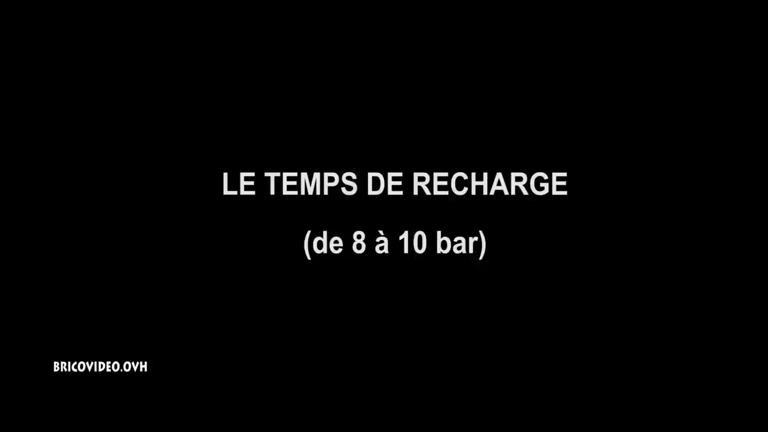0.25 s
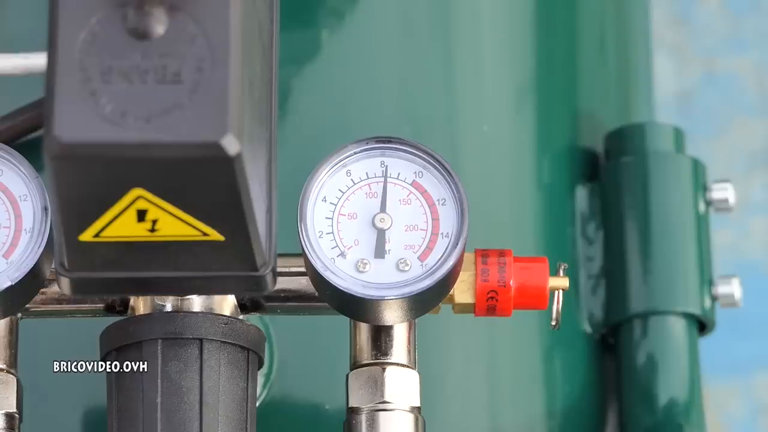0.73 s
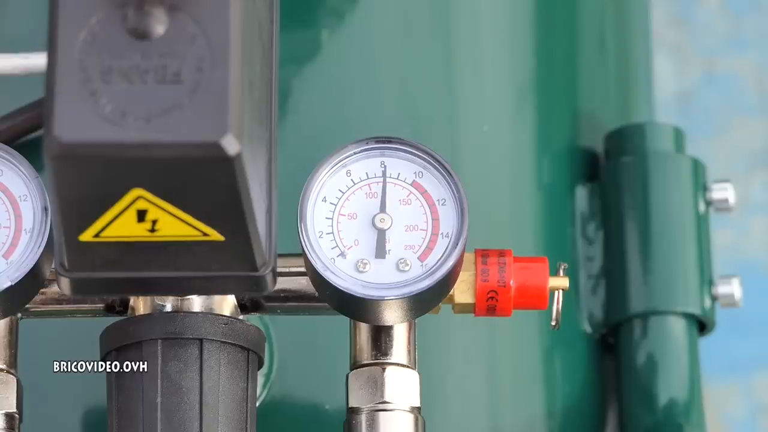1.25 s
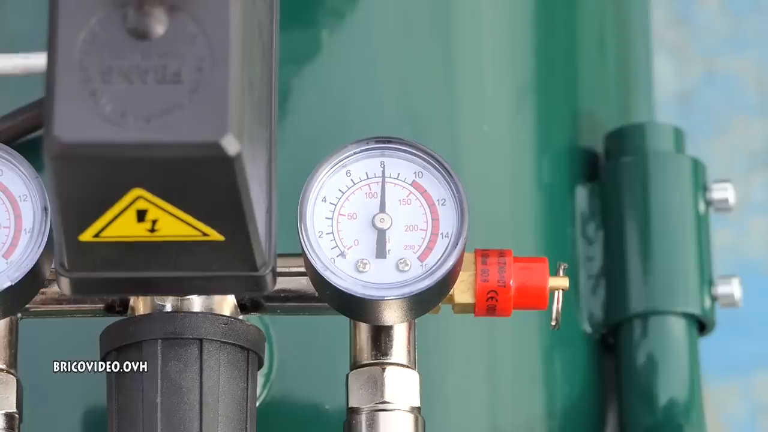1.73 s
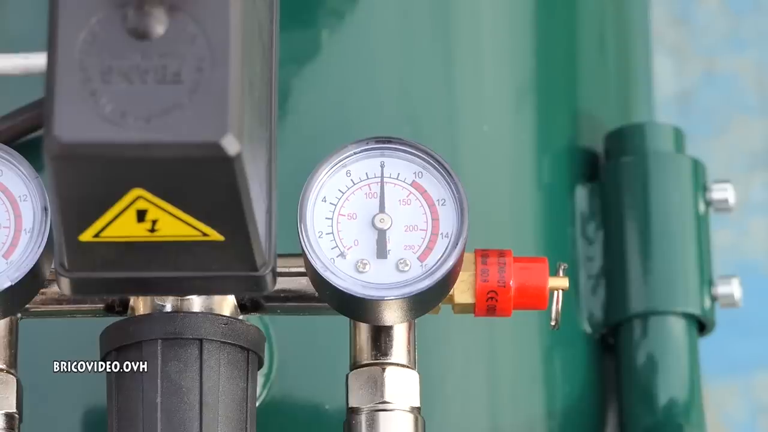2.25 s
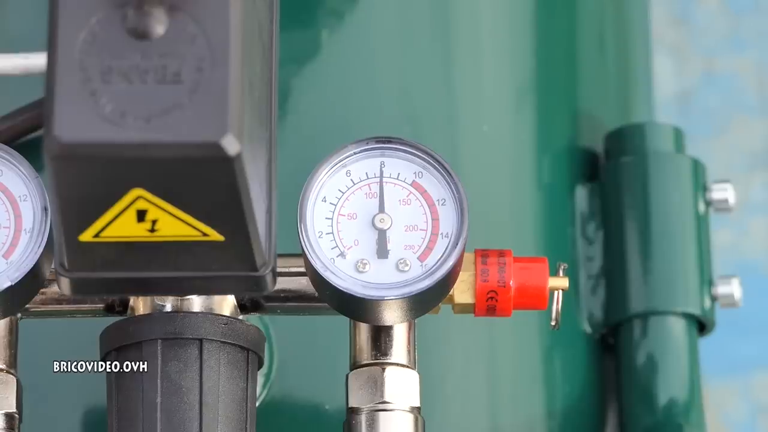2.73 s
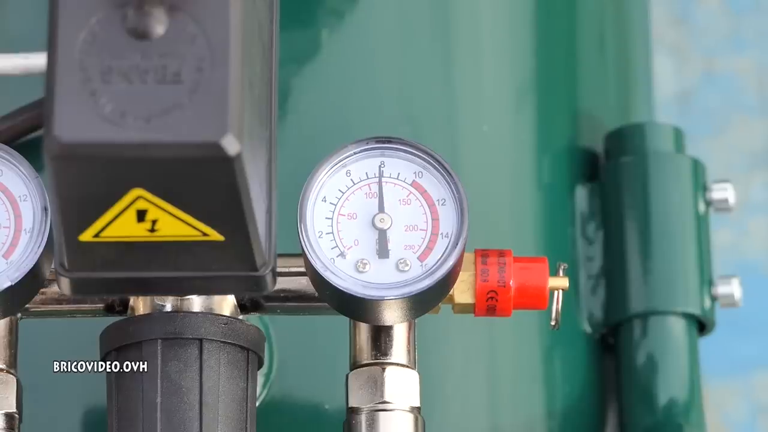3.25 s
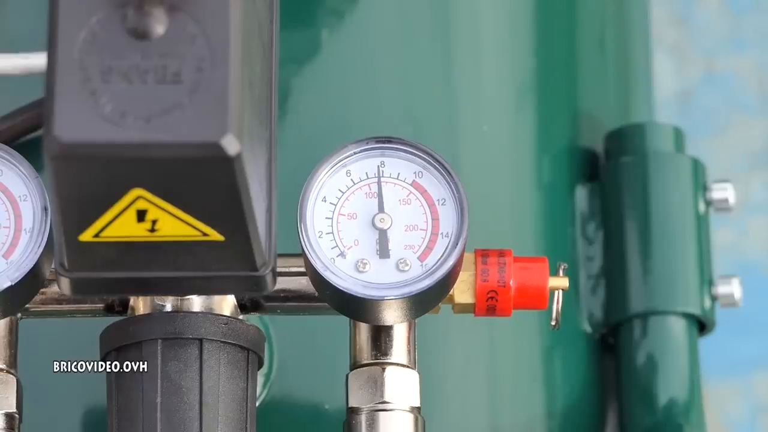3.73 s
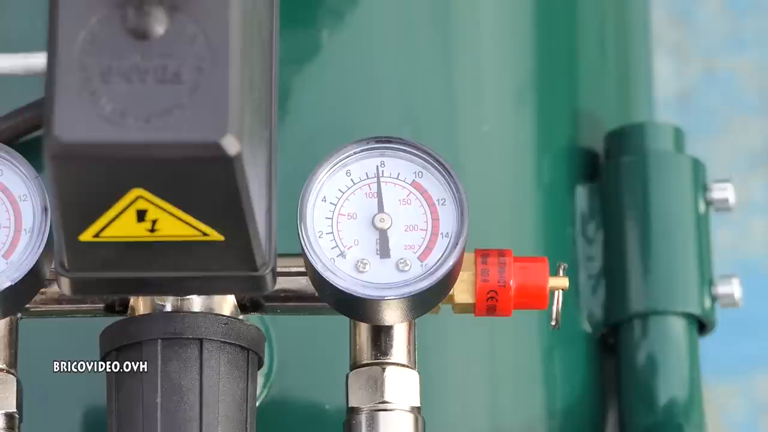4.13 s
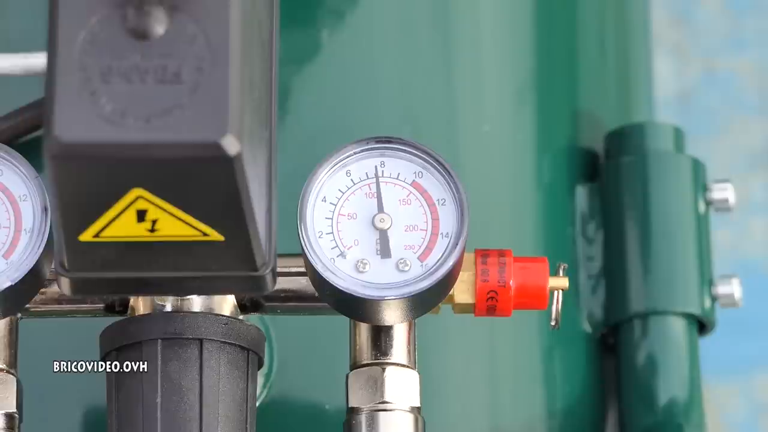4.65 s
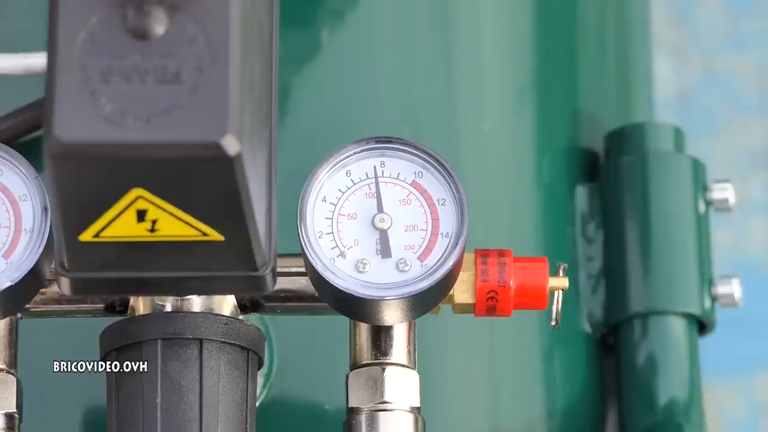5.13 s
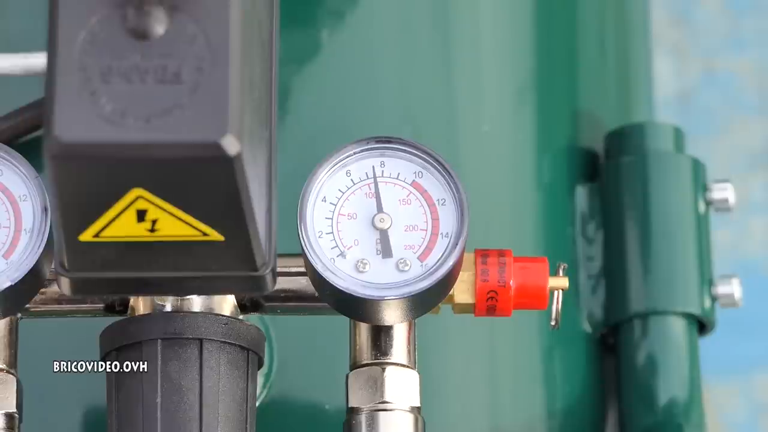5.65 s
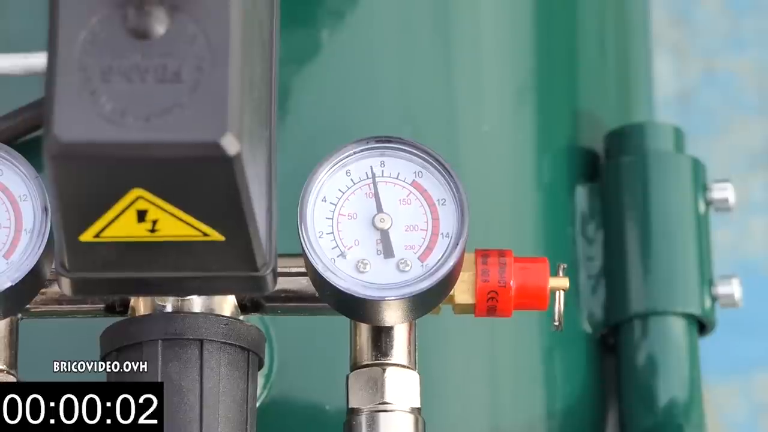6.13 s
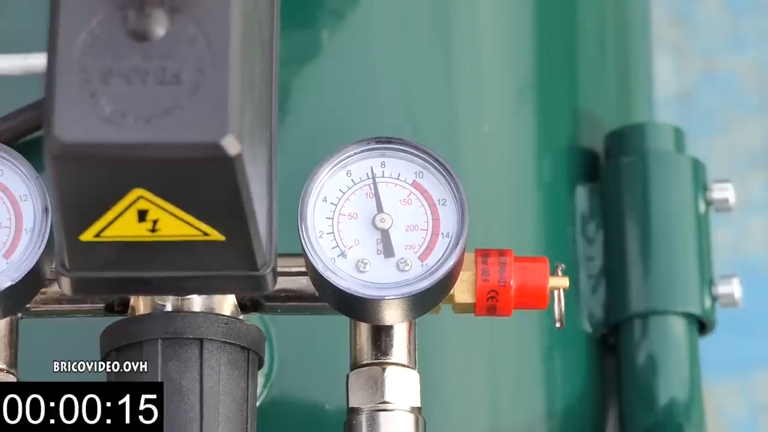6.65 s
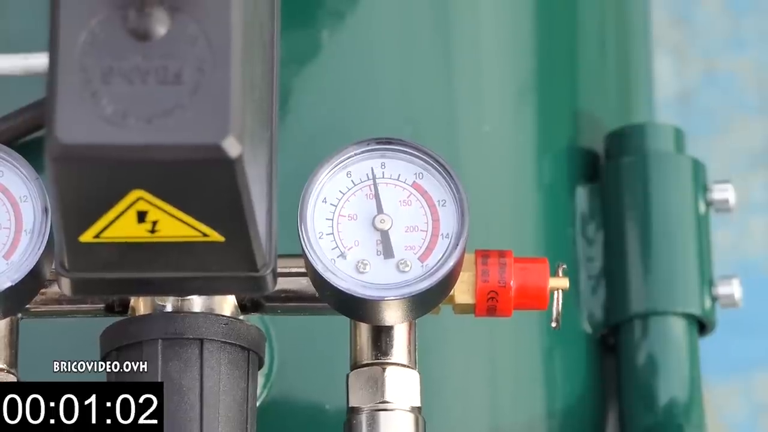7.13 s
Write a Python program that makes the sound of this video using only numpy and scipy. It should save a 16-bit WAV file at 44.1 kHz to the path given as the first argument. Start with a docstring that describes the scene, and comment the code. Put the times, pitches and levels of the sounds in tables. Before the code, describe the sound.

An air tool hammers rapidly with hissing puffs and metallic clacks, then stops as an electric compressor pump starts humming.

```python
"""Beside a compressor, an air tool hammers away, and near the end an electric pump cuts in behind it.
The tool puffs through its muffler, hisses and whistles at its ports and knocks its housing in every cycle;
now and then the piston strikes steel with a bright clack. Nearby metal scatters the tool's treble.
The pump hums in orders of its shaft speed, with a valve chuff each turn, gear clatter and fan noise.
The tool stops first and leaves the pump, which grows louder ever more slowly."""
import sys
import numpy as np
from scipy import signal
from scipy.fft import rfft, irfft, next_fast_len
from scipy.io import wavfile
from scipy.ndimage import uniform_filter1d, map_coordinates

SR = 44100
rng = np.random.default_rng(int(sys.argv[2]) if len(sys.argv) > 2 else 0)


def unload_audio(sound):
    """Save the sound as a 16-bit wav file, at the path given as the first command line argument."""
    columns = np.transpose(np.atleast_2d(sound))
    # keep every value between -1 and 1, then stretch to whole-number steps
    steps = np.round(np.clip(columns, -1, 1) * 32767)
    wavfile.write(sys.argv[1], SR, steps.astype(np.int16))


N = 326163
TIME = np.arange(N) / SR  # seconds


def amp(db):
    """Amplitude of a level in dB."""
    return 10 ** (np.asarray(db) / 20)


def unit(x):
    """x at rms 1."""
    return x / np.sqrt(np.mean(x ** 2) + 1e-20)


def ramp(x):
    """0 below 0, 1 above 1, straight between."""
    return np.clip(x, 0, 1)


def along(points, hz):
    """Read a curve of (Hz, value) points on a log frequency axis."""
    f, v = np.transpose(points)
    return np.interp(np.log(hz + 1), np.log(f + 1), v)


def wobble(rate):
    """A smooth random curve with rate knots a second."""
    knots = rng.standard_normal(int(N * rate / SR) + 4)
    return map_coordinates(knots, [TIME * rate])


def taps(times, sizes):
    """One impulse at each time in seconds."""
    return np.bincount(np.round(times * SR).astype(int), sizes, N)[:N]


def filtered(x, response):
    """x times a complex response of frequency, padded so that tails do not wrap round."""
    m = next_fast_len(N + SR // 2)
    f = np.fft.rfftfreq(m, 1 / SR)
    return irfft(rfft(x, m) * response(f), m)[..., :N]


def resonance(f, hz, width):
    """One causal resonance with a peak gain of 1; the narrower it is, the longer it rings."""
    return 1j * f * width / (hz * hz - f * f + 1j * f * width)


def body(modes):
    """Response of a solid body: (Hz, width, dB) modes added with alternating sign."""
    def response(f):
        return sum((-1) ** k * amp(db) * resonance(f, hz, width)
                   for k, (hz, width, db) in enumerate(modes))
    return response


def colour(points):
    """Response that follows a curve of (Hz, dB) points."""
    return lambda f: amp(along(points, f))


def noise(response, alike):
    """Stereo noise of rms 1; the balance of mid and side sets the left-right likeness at each pitch."""
    def mid_side(f):
        turn = np.arccos(np.clip(along(alike, f), 0, 1)) / 2
        return response(f) * np.array([np.cos(turn), np.sin(turn)])
    mid, side = filtered(rng.standard_normal((2, N)), mid_side)
    return unit(np.array([mid + side, mid - side]))


PUMP_ON_S, SPIN_UP_S = 5.9, .16
PUMP_DB, PUMP_GROWTH_DB, PUMP_GROWTH_S = -22, 13, 0.83  # full level, climb towards it, time constant


def pump_level():
    """A quick spin-up, then a slow climb towards full loudness."""
    running = np.maximum(TIME - PUMP_ON_S, 0)
    level_db = PUMP_DB - PUMP_GROWTH_DB * np.exp(-running / PUMP_GROWTH_S)
    return ramp(running / SPIN_UP_S) * amp(level_db)


VALVE_LEAK_DB = -10.5
# The pump's valves. Each row: opening point, rise and fade in shares of a turn, relative level in dB.
VALVE_RUSHES = [(.1, .04, .07, -6.5), (.41, .08, .22, 1.5)]


def valve_flow(turns):
    """Each valve opens once a turn and lets a short rush of air through, over a steady leak."""
    power = amp(VALVE_LEAK_DB) ** 2
    for opens, rise, fade, db in VALVE_RUSHES:
        since = (turns - opens) % 1
        fading = np.exp(-(np.maximum(since - rise, 0) / fade) ** 2)
        power = power + (amp(db) * ramp(since / rise) * fading) ** 2
    return np.sqrt(power)


SHAFT_HZ = 47.42
WEAK_ORDER_DB = -37  # relative level of every order not in the table
# Strong orders of the pump's hum. Each row: multiple of the shaft speed, relative level in dB.
HUM_ORDERS = [(2, -16), (3, -1.5), (4, -18), (5, -11), (6, -15), (8, 1), (9, -10), (10, -25), (12, -21.5),
              (13, -15), (15, -21), (16, -26), (17, -12.5), (18, -12), (19, -11), (20, -16.5), (21, -22),
              (25, -22), (29, -22.5), (30, -23), (32, -16.5)]


def pump_hum(angle, count=32, waver_db=3, spread=0.38):
    """Harmonics of the shaft speed; the high ones waver more and differ more between left and right."""
    strong = {round(order): db for order, db in HUM_ORDERS}
    hum = np.zeros((2, N))
    for k in range(1, count + 1):
        high = k / count
        # the casing delays each order differently, smearing the pressure pulse into an even buzz
        phase = 1.68 * k ** 2 + .3 * rng.standard_normal()
        phase = phase + spread * np.sqrt(high) * rng.standard_normal((2, 1))
        level_db = strong.get(k, WEAK_ORDER_DB) + waver_db * high * wobble(8) / 2
        hum += amp(level_db) * np.sin(k * angle + phase)
    return unit(hum)


def gear_clatter(turns):
    """The same burst of noise repeats on every turn, rung around 2 kHz."""
    length = round(SR / SHAFT_HZ)
    one_turn = rng.standard_normal(length)
    rattle = map_coordinates(one_turn, [turns % 1 * length], mode="grid-wrap")
    return unit(filtered(rattle, lambda f: resonance(f, 2050, 1040) ** 2))


# Colour of the valve chuff. Each row: frequency in Hz, spectral level in relative dB per Hz.
CHUFF_SPECTRUM = [(300, -2.5), (1500, -2), (2300, -4.5), (3500, -2), (5500, 0.5), (7500, -3), (10800, 3),
                  (12500, -1.5), (15500, -13)]
# Colour of the motor's fan. Each row: frequency in Hz, spectral level in relative dB per Hz.
FAN_SPECTRUM = [(25, -14), (100, 3), (400, -7), (650, -11), (880, 4), (1200, -18), (2200, 1.5), (3000, -12),
                (8000, -21), (16000, -35)]


def pump(chuff_db=-6, fan_db=-20, clatter_db=-22):
    """A steadily turning motor: hum, valve chuff, clatter and fan, balanced in dB against the hum."""
    turns = SHAFT_HZ * TIME
    hum = pump_hum(2 * np.pi * turns + .006 * wobble(12))
    chuff_noise = noise(colour(CHUFF_SPECTRUM), [(1000, 0.88)])
    chuff = amp(chuff_db + 0.82 * wobble(45)) * valve_flow(turns) * chuff_noise
    clatter = amp(clatter_db) * gear_clatter(turns)
    fan = amp(fan_db) * noise(colour(FAN_SPECTRUM), [(40, 0.16), (300, 0.84), (3000, 0.82)])
    return pump_level() * (hum + chuff + clatter + fan)


def surroundings(x, db=-8, t60=0.052):
    """Nearby metal scatters the treble, differently to each side, and ripples its spectrum."""
    t = np.arange(SR // 20) / SR
    tail = rng.standard_normal((2, len(t))) * amp(-60 * t / t60) * (t > .001)
    scattered = signal.fftconvolve(x, tail / np.linalg.norm(tail[0]), axes=1)[:, :N]
    return x + amp(db) * filtered(scattered, lambda f: 1j * f / (1500 + 1j * f))


PRESS_S, OPEN_S, LET_GO_S, BLEED_DB_PER_S = .679, 0.0084, 6.268, 350


def trigger():
    """Gate on the tool's sound: air comes on at once, holds, and bleeds away on release."""
    return ramp((TIME - PRESS_S) / OPEN_S) * amp(-BLEED_DB_PER_S * np.maximum(TIME - LET_GO_S, 0))


REBOUND_S = .0226  # beat of the strikes within a run
RUN_FALL_DB = 2.2  # loss for each step away from the hardest strike
# Runs of hard strikes on steel. Each row: time of the hardest in seconds, its relative level in dB,
# number of strikes before it, number of strikes after it.
STRIKE_RUNS = [(0.8037, -14.5, 0, 0), (.9408, -22, 0, 0), (1.082, -15, 0, 0), (1.3663, -12.5, 0, 0),
               (1.7453, -22, 0, 0), (1.8885, -23, 0, 0), (2.0245, -14.5, 1, 0), (2.308, -13, 1, 0),
               (2.6805, -12.5, 0, 0), (2.75, -25, 2, 0), (2.9222, -22, 0, 0), (3.0333, -13.5, 0, 0),
               (3.6373, -11.5, 1, 2), (4.1179, -15, 0, 0), (5.165, -19, 0, 0), (5.25, -12, 0, 2),
               (5.614, -17, 0, 0), (5.7132, -13, 2, 0), (5.9041, -14.5, 1, 0), (6.0401, -13.5, 1, 0)]


def strikes():
    """(seconds, dB) of every hard strike: in a run the piston rebounds at a steady, faster beat."""
    hits = []
    for s, db, before, after in STRIKE_RUNS:
        for k in range(-round(before), round(after) + 1):
            hits.append((s + k * REBOUND_S, db - RUN_FALL_DB * abs(k)))
    return hits


CYCLE_S, CYCLE_JITTER = .0293, .028  # nominal cycle, stretched to fit between strikes; jitter as a share
FIRST_BLOW_S, LAST_BLOW_S = .690, 6.294  # the cycles fill this span; the end itself has no blow


def piston_cycles(soft_db=-28, full_db=-13):
    """Blow times and hardness 0-1; a hard strike throws the piston back early."""
    marks = [(FIRST_BLOW_S, soft_db)] + strikes() + [(LAST_BLOW_S, soft_db)]
    times, force = [], []
    for k, ((start, db), (end, _)) in enumerate(zip(marks, marks[1:])):
        lead = REBOUND_S if k else CYCLE_S
        count = max(round((end - start - lead) / CYCLE_S), 0)
        steps = np.r_[lead, CYCLE_S * (1 + CYCLE_JITTER * rng.standard_normal(count))]
        stretch = (end - start) / steps.sum()
        times += list(start + (np.cumsum(steps) - steps) * stretch)
        force += [ramp((db - soft_db) / (full_db - soft_db))] + [0] * count
    return np.array(times), np.array(force)


# Partial notches cut by the muffler's chambers. Each row: frequency in Hz, width in Hz, depth 0-1.
MUFFLER_NOTCHES = [(171, 8.6, 0.48), (371, 16, 0.74), (624, 33, 0.48), (815.4, 23, 0.9)]
# Resonances of the muffler's chambers. Each row: frequency in Hz, width in Hz, relative level in dB.
MUFFLER_CHAMBERS = [(235, 40.4, 0), (424, 18, -29.5), (728, 63, -29)]
# Reflections of the puff. Each row: delay in seconds, signed strength as a share of the direct puff.
PUFF_ECHOES = [(.00486, -0.2), (.00786, -0.31), (0.016, .1)]


def muffler(f, boom_db=-25, low_hz=70):
    """Response from exhaust port to outlet: chambers, phase shift, boom, notches and reflections."""
    chambers = sum(amp(db) * resonance(f, hz, width) for hz, width, db in MUFFLER_CHAMBERS)
    allpass = 2 * resonance(f, 1035, 1500) - 1
    through = chambers * resonance(f, 690, 535) * allpass
    boom = amp(boom_db) * resonance(f, 128, 37) * resonance(f, 110, 130)
    notches = np.prod([1 - depth * resonance(f, hz, width) for hz, width, depth in MUFFLER_NOTCHES], axis=0)
    echoes = 1 + sum(g * np.exp(-2j * np.pi * f * s) for s, g in PUFF_ECHOES)
    outlet = f ** 2 / (f ** 2 + low_hz ** 2)  # a small outlet radiates little bass
    return (through + boom) * notches * echoes * outlet


def puffs(opens, force, db=32.5, scatter_db=0.63, bark_db=-4):
    """Low notes leave the muffler last, so puffs chirp down; the one after a hard strike barks brightly."""
    sizes = amp(db + scatter_db * rng.standard_normal(len(opens)))
    after_strike = np.roll(force, 1)
    barks = filtered(taps(opens, amp(bark_db) * sizes * after_strike), lambda f: resonance(f, 914, 410))
    return filtered(taps(opens, sizes) + barks, muffler)


SURGE_DELAY_S, SURGE_RISE_S, SURGE_FADE_S, LEAK_DB = .002, .0022, 0.0097, -8
RETURN_S, RETURN_WIDTH_S, RETURN_DB = .032, 0.0047, -8.5


def jet_flow(age, surge_db=-3.5):
    """Jet strength by seconds since opening: a dying surge over a leak, then a swell as the piston returns."""
    since = age - SURGE_DELAY_S
    surge = ramp(since / SURGE_RISE_S) * np.exp(-np.maximum(since - SURGE_RISE_S, 0) / SURGE_FADE_S)
    returning = np.exp(-((age - RETURN_S) / RETURN_WIDTH_S) ** 2)
    return amp(LEAK_DB) + amp(surge_db) * surge + amp(RETURN_DB) * returning


# Left-right likeness of the tool's noise. Each row: frequency in Hz, likeness 0-1.
TOOL_LIKENESS = [(40, 0), (300, 0.05), (1400, 0.32), (3000, 0.49), (7000, 0.93), (15000, 0.38)]


def tool_noise(response):
    """Air noise that spreads wide in the bass and narrows towards the treble, widening again at the top."""
    return noise(response, TOOL_LIKENESS)


# Ring of the tool's housing. Each row: frequency in Hz, width in Hz, relative level in dB.
HOUSING_MODES = [(1496, 38, -4.5), (1790, 47, -2.5), (1973, 70, -5.5), (2222, 103, -2), (2382, 126, -0.5),
                 (2488, 86, -3), (2720, 58, -5), (3330, 200, -9.5), (4820, 78, 1), (5920, 86, -0.5)]


def housing(f):
    """Response of the tool's housing."""
    return body(HOUSING_MODES)(f)


# Colour of the jet. Each row: frequency in Hz, spectral level in relative dB per Hz.
JET_SPECTRUM = [(30, -30), (100, -3), (400, 1), (1000, -4), (1500, -8.5), (2400, -3), (4200, -8), (4800, 0),
                (7000, -0.5), (10000, 1), (12500, -0.5), (14000, -5), (14800, -4), (15600, 0)]
# Edge tones of the exhaust ports. Each row: frequency in Hz, random spread in Hz, relative level in dB.
PORT_WHISTLES = [(8590, 120, -6), (9350, 25, -7), (9700, 75, -5.5), (13140, 87, 1)]


def exhaust(opens, force, jet_db=-24.5, whistle_db=-27, ring_db=-37.5, starve_db=10, scatter_db=1.16,
            whistle_scatter_db=3.5, choke_db=10):
    """Each cycle's jet hisses, rings the housing and whistles; a hard strike starves jet and whistle."""
    cycle = np.maximum(np.searchsorted(opens, TIME) - 1, 0)
    age = (TIME - opens[cycle]) % .036

    def chance():
        """One random draw held through each cycle."""
        return rng.standard_normal(len(opens))[cycle]

    starved_db = starve_db * force[cycle] * ramp((age - .004) / 0.023)
    # a short running mean, in samples, rounds the corners
    flow = uniform_filter1d(jet_flow(age) * amp(scatter_db * chance() - starved_db), size=70)
    flicker_db = 0.85 * wobble(700) + 1.15 * wobble(170)
    jet = amp(jet_db + flicker_db) * flow * tool_noise(colour(JET_SPECTRUM))
    ring = amp(ring_db + 2.5 * wobble(90)) * flow * tool_noise(housing)
    swell = np.exp(-((age - .011) / 0.0044) ** 2) * amp(-choke_db * force[cycle])
    for hz, spread, db in PORT_WHISTLES:
        # each surge catches the edge at a new pitch and strength
        pitch = hz + spread * (chance() + 1.1 * wobble(900))
        phase = 2 * np.pi * np.cumsum(pitch) / SR
        side_phase = 0.74 * np.array([chance(), chance()])
        tone = np.sin(phase + side_phase) * amp(3.95 * wobble(600))
        level = amp(whistle_db + db + whistle_scatter_db * np.minimum(chance(), 1))
        jet += level * flow * (0.27 + swell) * tone
    return jet + ring


# Ring of the struck steel. Each row: frequency in Hz, width in Hz, relative level in dB.
STEEL_MODES = [(5400, 960, 0), (6580, 830, 4), (7880, 210, 3)]


def knocks(blows, knock_db=3, strike_db=20):
    """Every blow rings the housing dully; the hard ones add a bright clack of steel."""
    soft = taps(blows, amp(knock_db + 2 * rng.standard_normal(len(blows))))
    hit_times, hit_db = np.transpose(strikes())
    hard = taps(hit_times, amp(hit_db + strike_db))
    thuds = filtered(soft, lambda f: housing(f) / (1 + 1j * f / 2500))
    clacks = filtered(hard, lambda f: body(STEEL_MODES)(f) * resonance(f, 7600, 4500))
    return thuds + clacks


# Stereo lean of the tool. Each row: frequency in Hz, left minus right in dB.
TOOL_LEAN = [(60, 6), (110, -2.5), (200, 0), (380, -1), (700, -1.0), (1290, -2.0), (2380, -3), (4400, -2.5),
             (8120, -2.5), (15000, 1.0)]


def air_tool(ahead=0.003998):
    """Puffs, jet and knocks, mostly a little to the right; the exhaust opens ahead (s) of each blow."""
    blows, force = piston_cycles()
    opens = blows - ahead
    sound = surroundings(puffs(opens, force) + exhaust(opens, force) + knocks(blows))
    placed = filtered(sound, lambda f: amp(np.array([along(TOOL_LEAN, f), -along(TOOL_LEAN, f)]) / 2))
    return trigger() * placed


def scene():
    """The tool hammers in front; the pump cuts in behind it and outlasts it."""
    return air_tool() + pump()


TOP_HZ = 15780


def record(dry):
    """A very steep low-pass: almost nothing remains above the top frequency."""
    return filtered(dry, lambda f: 1 / (1 + (f / TOP_HZ) ** 200))


dry = scene()
out = record(dry)
unload_audio(out)
```